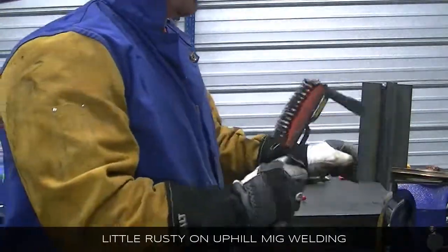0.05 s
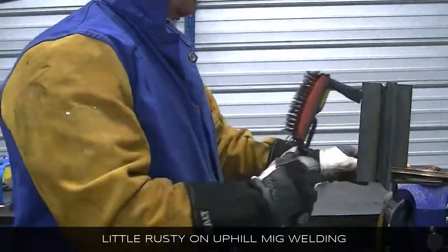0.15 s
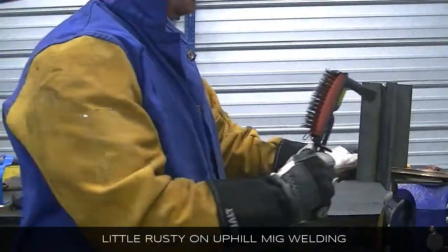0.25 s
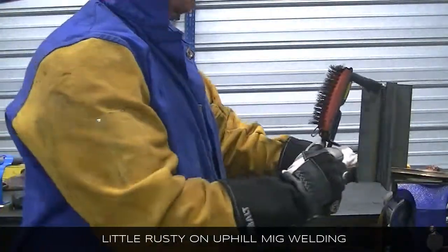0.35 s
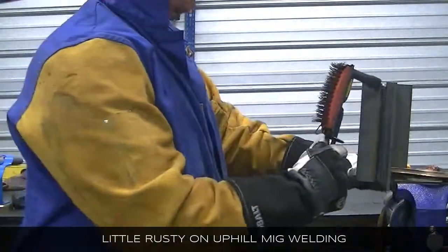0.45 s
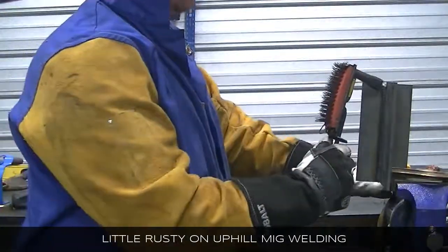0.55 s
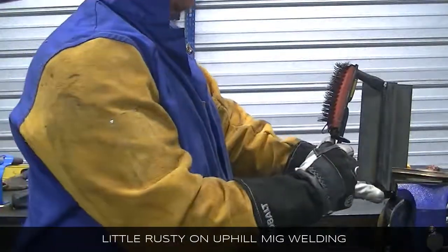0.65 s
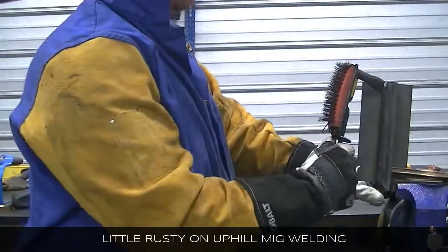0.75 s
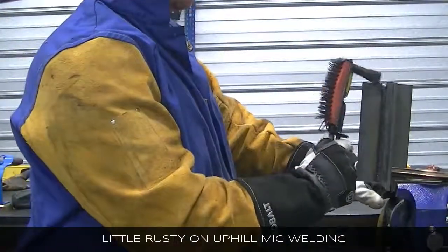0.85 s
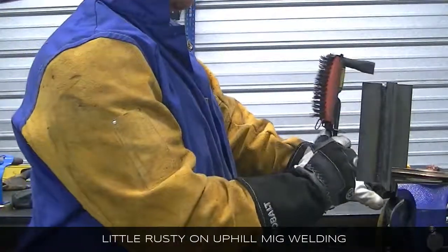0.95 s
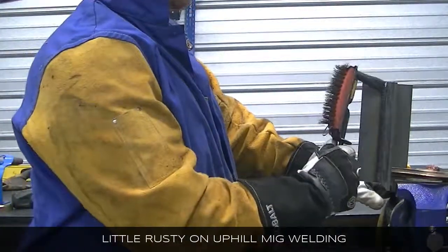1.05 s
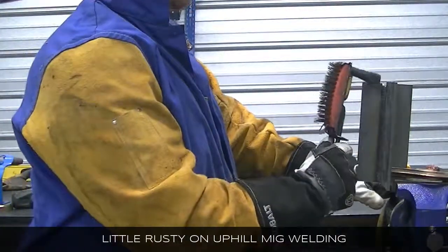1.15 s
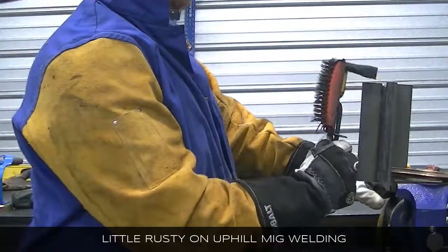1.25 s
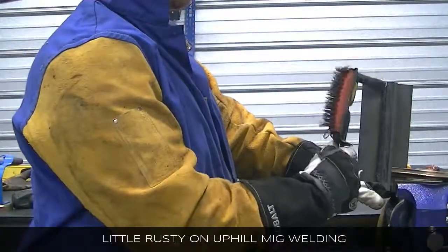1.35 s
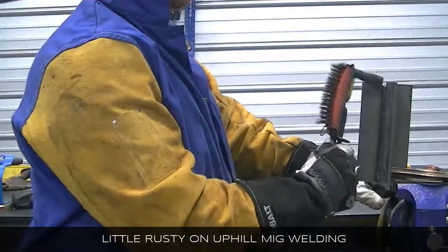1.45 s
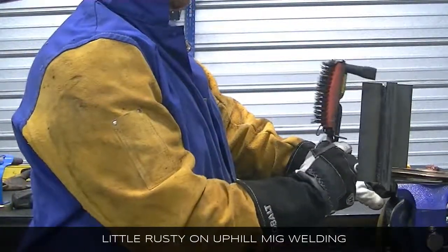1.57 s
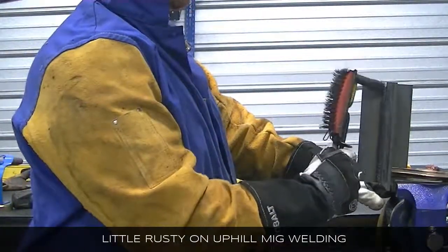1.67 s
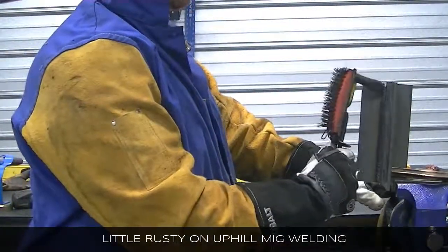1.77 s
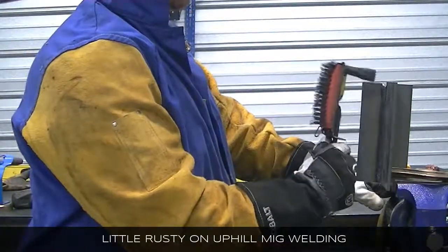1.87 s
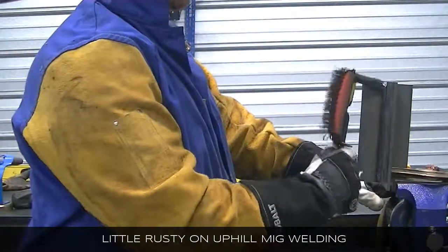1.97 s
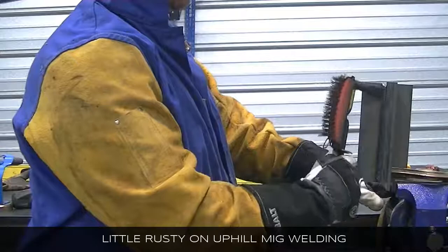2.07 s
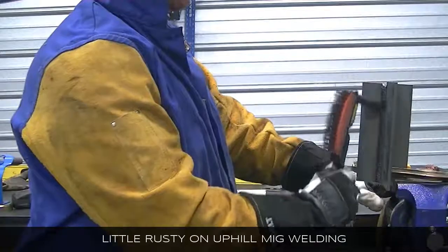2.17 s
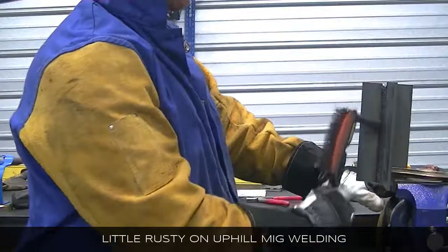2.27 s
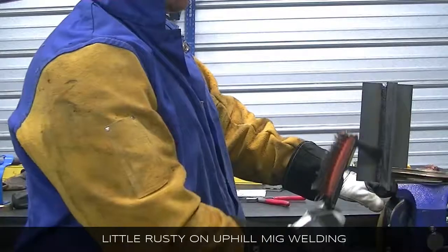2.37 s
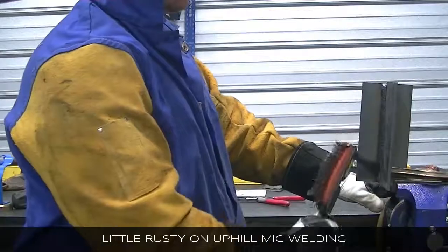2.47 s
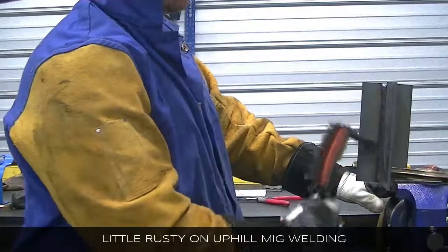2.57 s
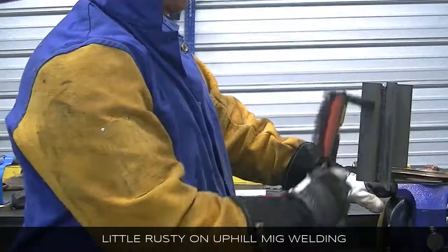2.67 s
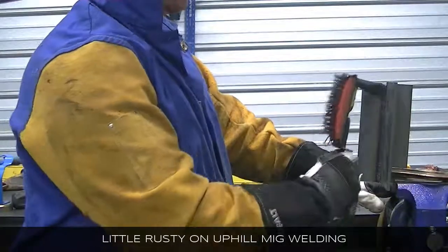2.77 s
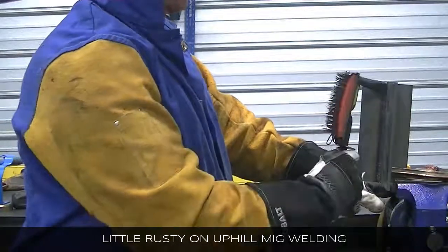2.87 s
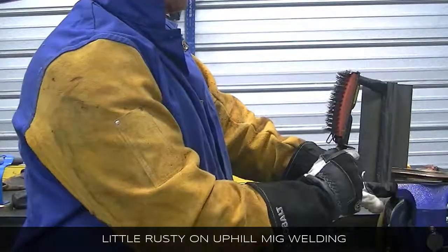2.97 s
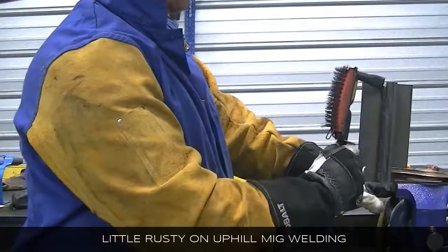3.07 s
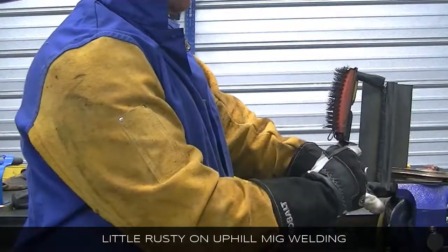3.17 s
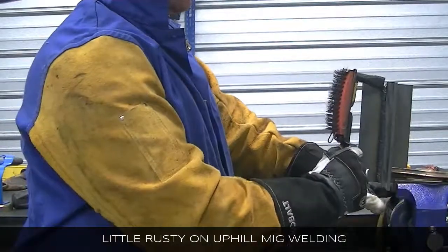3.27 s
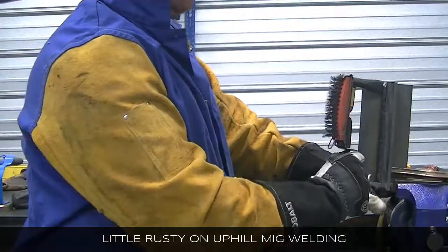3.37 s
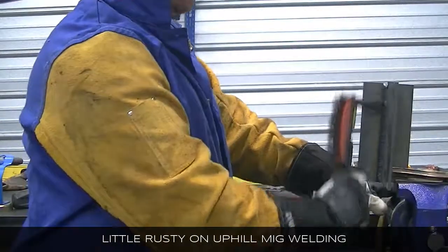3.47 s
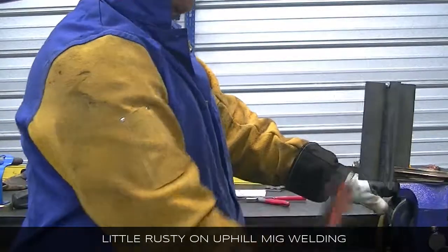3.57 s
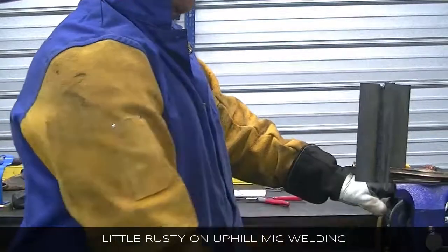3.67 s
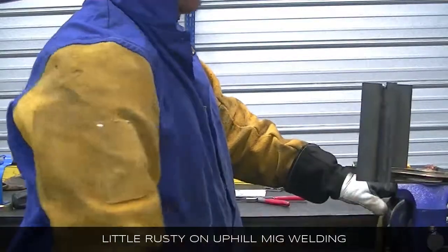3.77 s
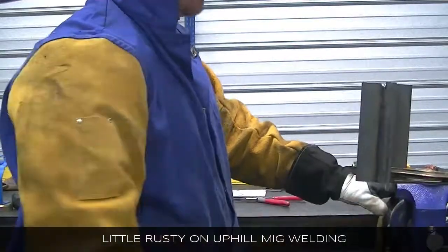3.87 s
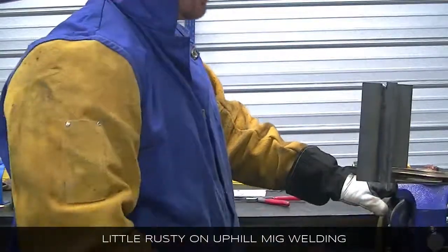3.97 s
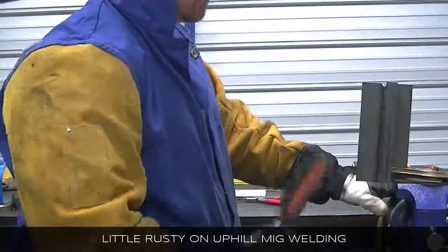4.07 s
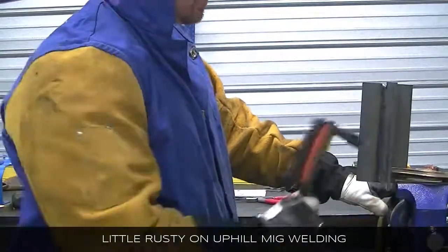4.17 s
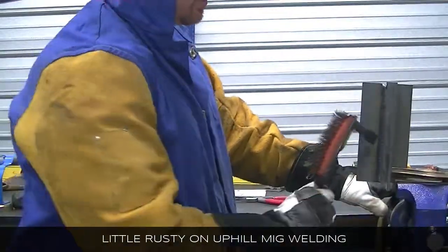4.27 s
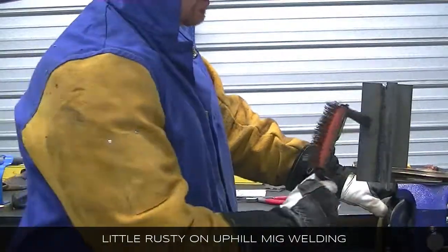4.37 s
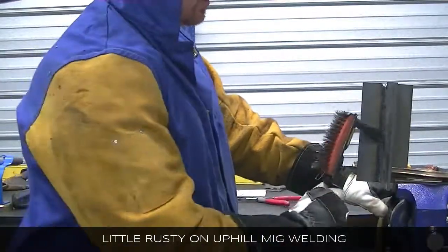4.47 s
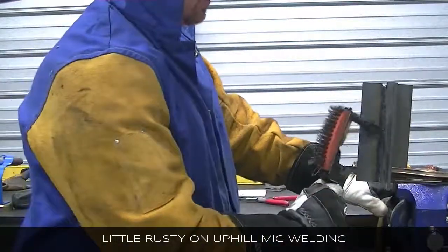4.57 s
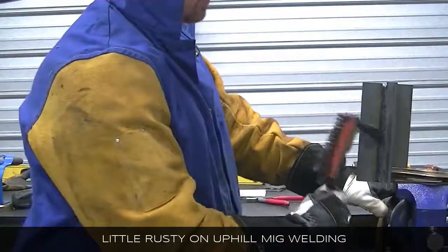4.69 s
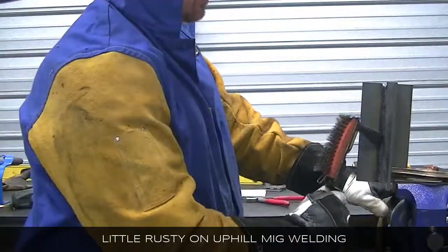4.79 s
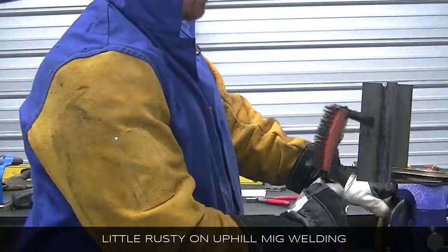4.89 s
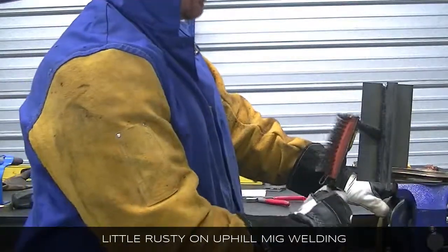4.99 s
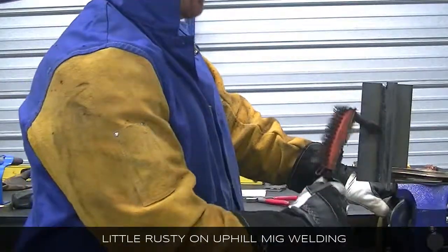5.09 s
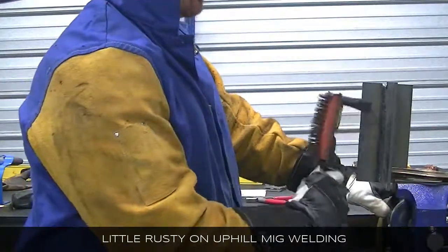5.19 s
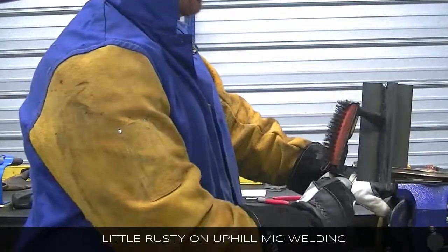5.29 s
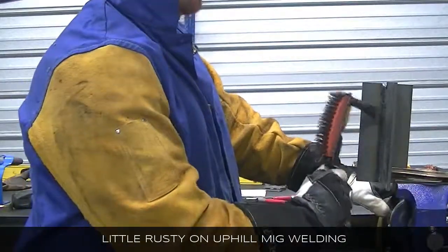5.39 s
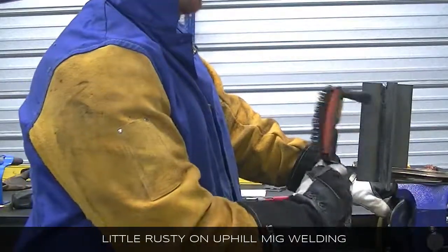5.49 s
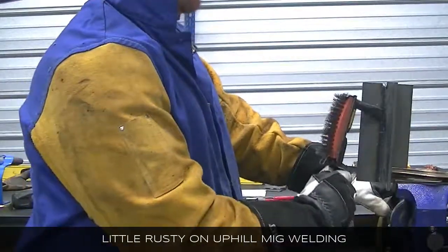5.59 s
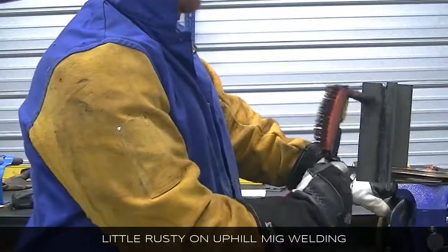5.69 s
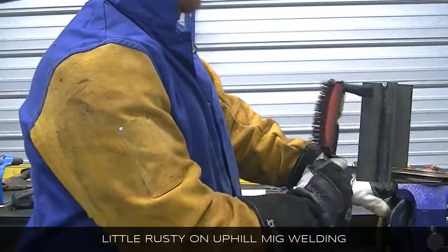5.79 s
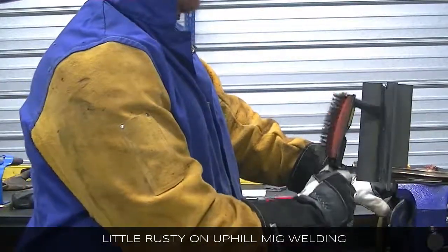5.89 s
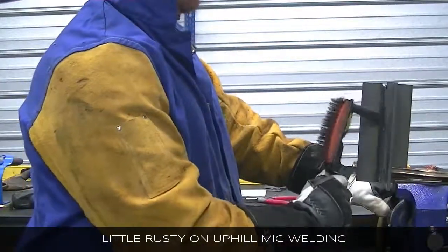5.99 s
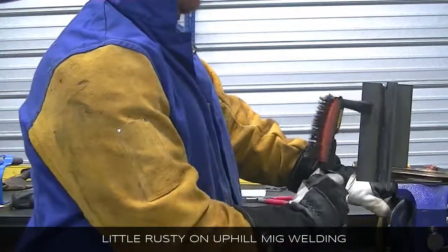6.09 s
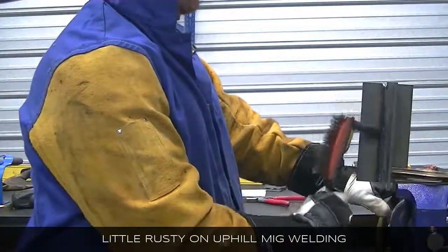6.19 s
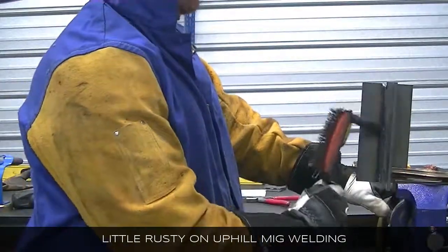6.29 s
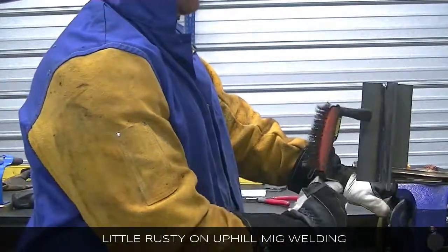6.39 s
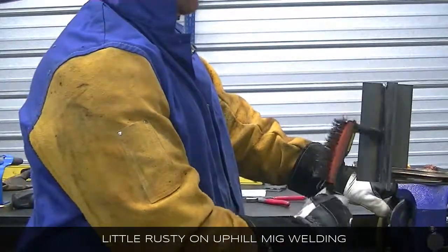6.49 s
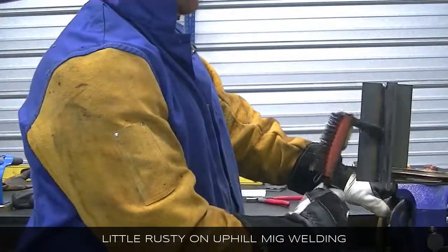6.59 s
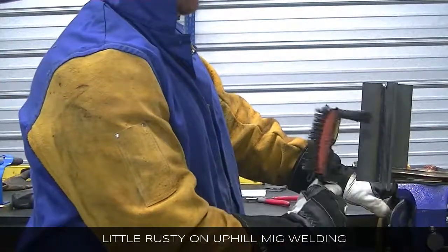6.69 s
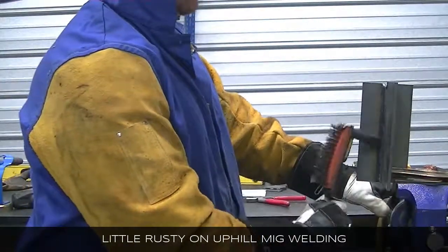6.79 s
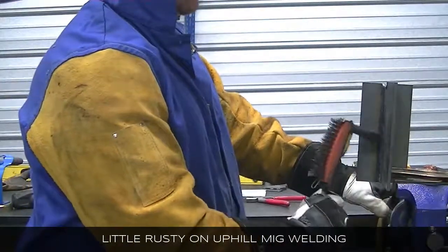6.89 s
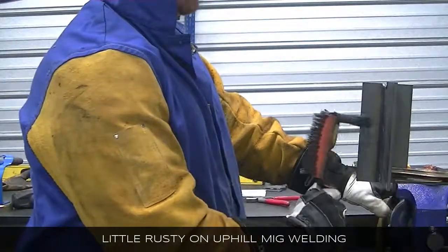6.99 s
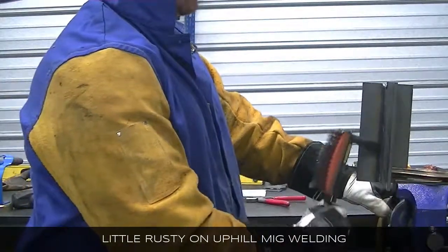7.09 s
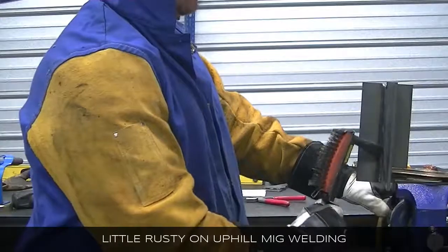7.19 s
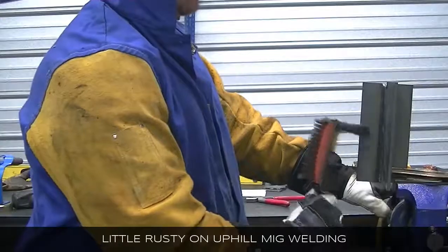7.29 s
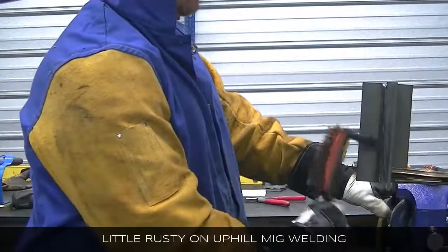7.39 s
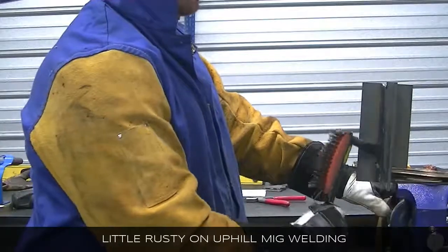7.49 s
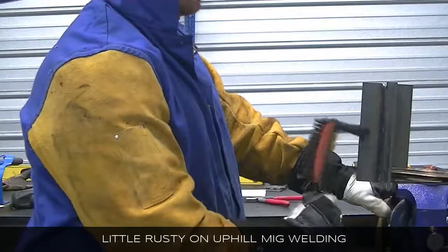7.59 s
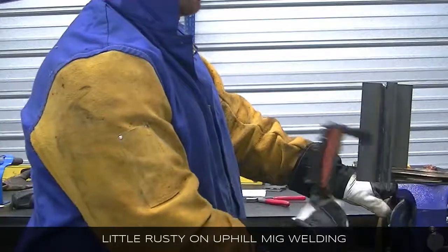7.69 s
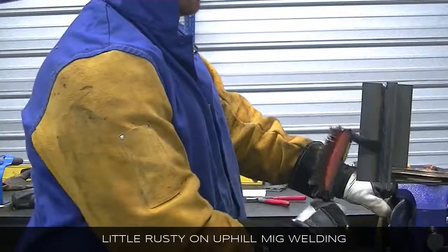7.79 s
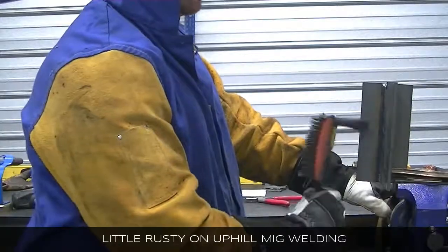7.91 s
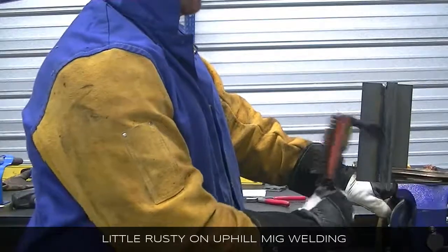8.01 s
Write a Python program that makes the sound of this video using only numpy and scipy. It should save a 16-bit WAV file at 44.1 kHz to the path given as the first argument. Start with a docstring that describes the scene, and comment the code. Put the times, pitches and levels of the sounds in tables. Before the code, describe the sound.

Hard metallic chipping blows in short spaced runs, with two brief scrapes and falling slag crumbs, echo brightly around a bare workshop.

```python
"""The steel scraper end of a wire brush chips slag off a welded joint, close to a single microphone.
Each blow cracks as a snap of noise, clatters as a longer burst and rings as dying sines. Twice the
blade drags over the weld: dense random bumps drive the same rings. Slag crumbs tick on the bench as
thin high noise. The metal walls of the bare workshop answer with a noise echo that dies over most of
a second; still air, a faint hum and the tail of an earlier sound lie underneath."""
import sys
import numpy as np
from scipy import signal
from scipy.fft import rfft, irfft
from scipy.io import wavfile
from scipy.ndimage import uniform_filter1d

SR = 44100
rng = np.random.default_rng(int(sys.argv[2]) if len(sys.argv) > 2 else 0)


def wav_out(sig):
    """Save sig, one row per channel (or a flat mono array), as 16-bit PCM at SR to the path in sys.argv[1]."""
    wavfile.write(sys.argv[1], SR, np.round(np.clip(np.atleast_2d(sig).T, -1, 1) * 32767).astype(np.int16))


def volts(x):
    """Linear amplitude factor 10**(x/20) for a level x in dB, scalar or array-like."""
    e = np.asarray(x, float) / 20
    return 10 ** e


N = 355005  # samples


def read(points, hz):
    """A spectrum table read at the frequencies hz, straight lines over log frequency."""
    f, value = np.transpose(points)
    return np.interp(np.log(hz + 1), np.log(f + 1), value)


def evened(x):
    """Scales to rms 1."""
    return x / np.sqrt(np.mean(x ** 2) + 1e-20)


def add(mix, s, sound):
    """Mixes a sound in at s seconds."""
    part = mix[round(s * SR):][:len(sound)]
    part += sound[:len(part)]


def coloured(x, points):
    """Causal minimum-phase filter with the gain of a spectrum table."""
    hz = abs(np.fft.fftfreq(4096, 1 / SR))
    log_gain = np.log(volts(read(points, hz)))
    taps = np.fft.ifft(np.exp(np.conj(signal.hilbert(log_gain)))).real[:2048]
    return signal.oaconvolve(x, taps)[:len(x)]


def filtered(x, order, hz, kind):
    """Butterworth low or high pass."""
    return signal.sosfilt(signal.butter(order, hz, kind, fs=SR, output="sos"), x)


def tilted(points, low_db, treble_db):
    """Lifts the low and the high end of a spectrum table."""
    corners = np.log([1510, 2300, 5030, 6300])
    return [(hz, db + np.interp(np.log(hz), corners, [low_db, 0, 0, treble_db])) for hz, db in points]


def burst(noise, rise_s, fall_s):
    """Noise under a rise and fall, with the energy of its envelope."""
    t = np.arange(len(noise)) / SR
    shape = (1 - np.exp(-t / rise_s)) * np.exp(-t / fall_s)
    return noise * shape * np.linalg.norm(shape) / np.linalg.norm(noise * shape)


def snap(noise, rise_s, fall_s):
    """A short burst whose spectrum is kept even, since so brief a noise draw has a chance colour."""
    x = burst(noise, rise_s, fall_s)
    energy = np.linalg.norm(x)
    t = np.arange(len(noise)) / SR
    span = np.minimum(1, np.exp(3 - t / fall_s)) * (1 - np.exp(-4 * t / rise_s))
    for _ in range(4):  # flatten the spectrum, then hold the snap short again
        z = rfft(x)
        x = span * irfft(z / (abs(z) + 1e-9), len(x))
    return x * energy / np.linalg.norm(x)


# what is left in the shop of an earlier sound: (frequency [Hz], relative level per Hz [dB])
EARLIER_COLOUR = [(59, -54), (100, -33), (295, -16), (801, -22), (1150, -19), (2580, -15), (16000, -36)]


def earlier(start_db=-58, t60_s=0.64):
    """The last of an echo whose cause is already over: coloured noise that only dies away."""
    fade = volts(start_db - 60 * np.arange(N) / SR / t60_s)
    return fade * evened(coloured(rng.standard_normal(N), EARLIER_COLOUR))


# still air of the shop: (frequency [Hz], relative level per Hz [dB])
AIR_COLOUR = [(25, -6), (60, -19), (90, -16.5), (140, 0), (400, -1.5), (750, -0.5), (1200, -3.5),
              (3500, -8.5), (8000, -15), (12000, -16), (16000, -19)]
# faint hum of the shop: (frequency [Hz], width [Hz], level [dB])
HUM_BANDS = [(537, 13, -92.5), (638, 44, -100), (801, 21, -79.5)]


def air(air_db=-70.5):
    """Steady hiss with a few fuzzy hum bands, each a narrow resonance on noise."""
    out = volts(air_db) * evened(coloured(rng.standard_normal(N), AIR_COLOUR))
    for hz, width, db in HUM_BANDS:
        b, a = signal.iirpeak(hz, hz / width, SR)
        out += volts(db) * evened(signal.lfilter(b, a, rng.standard_normal(N)))
    return out


def ring(modes, place, luck=np.zeros(20), node_db=7, rise_cycles=0.4, luck_db=4):
    """Dying sines that rise within about two cycles; each is loudest when struck at its own place."""
    hz, db, t60, best = np.transpose(modes)[:, :, None]
    t = np.arange(SR // 2) / SR
    place_db = node_db * (np.cos(2 * np.pi * (place - best)) - 1)
    struck_db = db + place_db + luck_db * luck[:len(modes), None]
    rise = (1 - np.exp(-t * hz / rise_cycles)) ** 2
    side = (-1.) ** np.arange(len(modes))[:, None]  # neighbouring modes swing opposite ways
    sines = side * volts(struck_db - 60 * t / t60) * rise * np.sin(2 * np.pi * hz * t)
    return sines.sum(0)


# rings of plates and blade, low to high, each list with the columns
# (frequency [Hz], relative level [dB], t60 [s], place on the weld where it rings most [0-1])
LOW_MODES = [(148.7, -50, 0.56, 0.57), (161.2, -51.5, 0.93, 0.66), (268, -37.5, 0.13, 0.7),
             (322.6, -40.5, 0.12, 0.6), (508.3, -25, 0.1, 0.83), (642.6, -32, 0.36, 0.54),
             (736, -18, 0.045, 0.59), (1080, -36.5, 0.14, 0.92), (1184, -8, 0.073, 0.11),
             (1173.5, -20.5, 0.22, 0.42), (1194, -14, 0.043, 0.73), (1314, -20, 0.083, 0.9),
             (1406, -23, 0.4, 0.47), (1440, -33, 0.13, 0.7), (1716, -18, 0.038, 0.59),
             (1800, -29, 0.17, 0.8)]
CLEAR_MODES = [(2862, -14.5, 0.12, 0.76), (2855, -34.5, 0.23, 0.93), (2740, -43, .03, 0.31),
               (3300, -30, 0.18, 0.3), (3466, -30.5, 0.56, 0.64), (2770, -33, .15, 0.29)]
BLADE_MODES = [(3966, 0, 0.023, 0.39), (4104, -0.5, 0.023, 0.7), (4249, -1.5, 0.018, 0.53),
               (4360, -1, 0.019, 0.41), (4512, -10, .03, 0.74)]
TREBLE_MODES = [(6416, -38, 0.37, 0.57), (6430, -19, 0.022, 0.59), (7463, -42, 0.29, 0.44),
                (7500, -38, 0.23, 1), (7860, -35.5, .12, 1), (8700, -32, 0.026, 0.95),
                (8970, -31, 0.16, 0.27), (10740, -35, 0.08, .4), (11200, -37, 0.068, 0.4),
                (12050, -39, .08, .9), (12460, -37.5, .1, 0.34), (13500, -45, 0.095, 1),
                (13880, -49, .12, .78), (14300, -34, 0.035, .55)]


def joint(low_db, clear_db, treble_db, place, luck):
    """All rings of plates and blade after one contact; the treble depends least on the place."""
    low = volts(low_db) * ring(LOW_MODES, place, luck)  # by luck no two blows stir a mode alike
    clear = volts(clear_db) * ring(CLEAR_MODES, place)
    treble = volts(treble_db) * ring(TREBLE_MODES, place, luck, node_db=4.5)
    return low + clear + ring(BLADE_MODES, place) + treble


# blows and their bounces on the weld:
# (time [s], strength [dB], clear ring [dB], treble [dB], place on the weld [0-1])
BLOW_LIST = [(0.371, -63, -14, -19, 1), (0.6706, -54, -10, 20, 0.73), (1.0411, -20, 10, 2.5, 1),
             (1.343, -8, 7.5, 2.5, 0.85), (1.6397, -7.5, 11, 4, .9), (1.9822, -4, 10.5, 3, 0.94),
             (2.805, -32.5, 10, 1.5, 0.9), (3.11, -47, -17, 12, 0.85), (3.339, -29, 7, 4, 0.92),
             (4.461, -20, 6.5, 6.5, 0.49), (4.711, -22, 1, -23, 0.49), (4.719, -16.5, -5, -1, 0.92),
             (4.983, -19.5, 1.5, 8, 0.68), (5.268, -14.5, 1, 7.5, 0.84), (5.548, -18, 0.5, 11, 0.76),
             (5.849, -7.5, 7, 3.5, 0.7), (6.1739, -9.5, 6.5, 4, 0.63), (6.465, -11, 7, 7, 0.7),
             (6.7655, -8, 9, 5, 0.61), (7.084, -13, 0.5, 7, 0.45), (7.095, -20.5, 13, -25, 0.76),
             (7.406, -12.5, 14, 14, 0.44), (7.415, -11.5, -6.5, -22, 0.27), (7.724, -20, 15, 18.5, 0.48),
             (7.73, -10, 0.5, -26, 0.58), (8.036, -23, 15, 5, 0.52), (8.046, -20.5, 1, 8, 0.27)]
# crack of the first milliseconds: (frequency [Hz], gain [dB])
CRACK_COLOUR = [(200, -59), (600, -17.5), (1250, 15.5), (2000, 12), (2750, 14), (3050, 11.5), (3700, 10),
                (4300, 11.5), (5500, 4.5), (8000, -11), (13000, -9.5), (16000, -49)]
# clatter of countless small plate modes just after it: (frequency [Hz], gain [dB])
CLATTER_COLOUR = [(60, -46.5), (130, -34.5), (240, -14), (500, -2), (800, -1.5), (1250, -5.6), (1900, -8.5),
                  (2750, -10.5), (3050, -16), (3700, -14.5), (4300, -1), (5000, -11), (6400, -9),
                  (10000, -23.5), (16000, -32.5)]


def blows(crack_db=-2, clatter_db=-18, low_even_db=-18, low_loss=0.41, low_most_db=5):
    """Slag cracks, plates clatter (both noise) and the joint rings on: rows noise, rings.
    The low end grows more slowly than the blow: low_loss is the dB lost per dB of strength."""
    noise, rings = np.zeros((2, N))
    draws = rng.standard_normal((len(BLOW_LIST), 2, 8192))
    for (s, db, clear_db, treble_db, place), (grit, hiss) in zip(BLOW_LIST, draws):
        low_db = min(low_loss * (low_even_db - db), low_most_db)
        crack = volts(crack_db) * snap(grit, rise_s=0.00087, fall_s=0.0017)
        clatter = volts(clatter_db) * burst(hiss, rise_s=0.0012, fall_s=0.059)
        add(noise, s, volts(db) * coloured(crack, tilted(CRACK_COLOUR, low_db, treble_db)))
        add(noise, s, volts(db) * coloured(clatter, tilted(CLATTER_COLOUR, low_db, treble_db)))
        add(rings, s, volts(db) * joint(low_db, clear_db, treble_db, place, luck=hiss))
    return noise, rings


# pressure of the dragging blade, one list per drag: (time [s], level [dB])
DRAG_PRESSURE = [
    [(2.10, -53), (2.14, -47), (2.24, -51.5), (2.32, -50), (2.38, -44.5), (2.44, -49), (2.48, -64),
     (2.55, -83)],
    [(3.29, -63.5), (3.33, -66), (3.36, -48), (3.42, -63), (3.47, -42.5), (3.55, -37.5), (3.59, -32.5),
     (3.63, -52), (3.68, -59)],
]
# grinding of slag under the blade: (frequency [Hz], gain [dB])
GRIND_COLOUR = [(100, -21), (300, -16), (700, -13), (1250, 4), (2500, 5.5), (4300, 5), (6500, -2),
                (11000, -18), (16000, -35)]


def bumps(bumps_per_s=2500, spread_db=4.0, catch_db=4.25):
    """Ripples of the weld as random pulses of either sign, swelling as the edge catches and slips."""
    height = volts(spread_db * np.minimum(rng.exponential(1, N), 4))
    pulses = (rng.random(N) < bumps_per_s / SR) * height
    catches = evened(uniform_filter1d(rng.standard_normal(N), size=600))
    return evened(pulses * rng.choice([-1, 1], N) * volts(catch_db * catches))


def drags(mid_db=-47.5, low_db=5.5, low_loss=0.28, treble_db=3.5, treble_loss=0.2, grind_db=7,
          ring_db=-15, clear_db=3, blade_db=3, sizzle_db=6, place=0.79, treble_place=0.61):
    """The blade chatters over the weld: dense tiny blows drive the grinding and the rings.
    Low end and treble lose some dB (low_loss, treble_loss) per dB of pressure above mid_db."""
    chatter = bumps()
    t, drive = np.arange(N) / SR, np.zeros((3, N))  # rows low, middle, treble
    for rows in DRAG_PRESSURE:
        s, db = np.transpose(rows)
        low_lift = low_db - low_loss * (db - mid_db)
        treble_lift = treble_db - treble_loss * (db - mid_db)
        for row, lift in zip(drive, (low_lift, 0, treble_lift)):
            row += volts(np.interp(t, s, db + lift, -200, -200)) * chatter
    grind = volts(grind_db) * coloured(signal.unit_impulse(SR // 2), GRIND_COLOUR)
    low = filtered(grind, 2, 2000, "low")
    high = filtered(grind, 2, 5700, "high")
    middle_ring = volts(clear_db) * ring(CLEAR_MODES, place) + volts(blade_db) * ring(BLADE_MODES, place)
    treble_ring = volts(sizzle_db) * ring(TREBLE_MODES, treble_place)
    rings = np.array([ring(LOW_MODES, place), middle_ring, treble_ring])
    body = volts(ring_db) * rings + [low, grind - low - high, high]
    return signal.oaconvolve(drive, body, axes=1).sum(0)[:N]


def crumb(chip, fine, tick_db=4, dust_db=-26, edge_hz=5600, edge_spread=0.12):
    """A crumb on the bench: a thin tick and finer dust, high-passed at an edge that varies by chance."""
    tick = volts(tick_db) * snap(chip, rise_s=0.00005, fall_s=0.00016)
    dust = volts(dust_db) * burst(fine, rise_s=0.001, fall_s=0.057)
    return filtered(tick + dust, 3, edge_hz * np.exp(edge_spread * chip[0]), "high")


# the larger slag crumbs: (time [s], level [dB])
CRUMB_FALLS = [(2.1403, -33), (2.1724, -37), (2.219, -39), (2.3156, -27), (3.4236, -34), (3.4518, -37),
               (3.469, -20), (3.570, -18), (3.6197, -25), (3.898, -25.5), (3.937, -28), (3.955, -41.5),
               (4.0242, -32.5), (4.1933, -34.5), (4.2042, -34), (4.3573, -41), (4.409, -42), (4.4754, -39),
               (6.036, -35.5), (7.9404, -45)]
# showers of tiny crumbs: (start [s], end [s], level [dB])
CRUMB_SHOWERS = [(2.1, 2.5, -45), (3.4, 3.7, -42), (3.95, 4.35, -55)]


def crumbs(shower_per_s=14, shower_spread_db=2.5):
    """Larger crumbs fall at their times; tiny ones, all of one sound, fall at random in showers."""
    out, t = np.zeros(N), np.arange(N) / SR
    for (s, db), pair in zip(CRUMB_FALLS, rng.standard_normal((len(CRUMB_FALLS), 2, 8192))):
        add(out, s, volts(db) * crumb(*pair))
    level = sum(volts(db) * (t > start) * (t < end) for start, end, db in CRUMB_SHOWERS)
    sizes = volts(shower_spread_db * rng.standard_normal(N))
    falls = level * (rng.random(N) < shower_per_s / SR) * sizes
    return out + signal.oaconvolve(falls, crumb(*rng.standard_normal((2, 8192))))[:N]


# decay of the workshop: (frequency [Hz], t60 [s])
ECHO_T60 = [(120, 0.4), (330, 0.96), (870, 0.84), (2300, 1.036), (6000, 0.73), (10000, 0.59), (16000, 0.45)]
# strength of its echo: (frequency [Hz], level [dB])
ECHO_LEVEL = [(100, 1.5), (300, 16), (1000, 13), (2500, -0.5), (5000, 0.5), (10000, -6), (16000, -8)]
# build-up of its echo: (frequency [Hz], time constant [s])
ECHO_RISE = [(150, 0.0071), (1000, 0.014), (4000, 0.001), (16000, 0.00082)]


def shop_echo():
    """Echo of the metal walls: noise that builds up and dies band by band, silent for 4 ms."""
    hz, t, z = signal.stft(rng.standard_normal(SR * 3 // 2), SR, nperseg=256)
    fade = volts(-60 * t / read(ECHO_T60, hz)[:, None])
    shape = fade * (1 - np.exp(-t / read(ECHO_RISE, hz)[:, None]))
    shape /= np.sqrt((shape ** 2).sum(1, keepdims=True) * SR * (t[1] - t[0]))  # energy 1 in every band
    echo = signal.istft(z * shape * volts(read(ECHO_LEVEL, hz))[:, None], SR, nperseg=256)[1]
    return echo * (np.arange(len(echo)) > 0.004 * SR)


def walls(sent, cycle_s=2.3):
    """Three random echoes of the one shop, blended in turn so no single draw stamps its peaks."""
    turn = 2 * np.pi * (np.arange(N) / SR / cycle_s + np.arange(3)[:, None] / 3)
    shares = np.sqrt(2 / 3) * np.cos(turn)  # the squares always sum to 1
    return sum(signal.fftconvolve(sent * share, shop_echo())[:N] for share in shares)


def overload(x, ceiling=0.9):
    """The hardest cracks overload the microphone softly."""
    return x / (1 + abs(x / ceiling) ** 4) ** 0.25


def scene(crumb_echo_db=-8, ring_echo_db=-5):
    """Direct sound and its echo, which carry little bass, over the background."""
    (noise, rings), drag, dust = blows(), drags(), crumbs()
    sent = noise + drag + volts(ring_echo_db) * rings + volts(crumb_echo_db) * dust
    near = overload(noise + drag + rings + dust + walls(sent))
    thin = filtered(near, 2, 150, "high")
    return (thin + earlier() + air())[None]


def low_pass(x):
    """Removes everything above the highest recorded frequency."""
    return signal.sosfilt(signal.butter(12, 16800, fs=SR, output="sos"), x)


def record(dry, top_hz=16050):
    """The finished mix, with nothing much kept above top_hz."""
    edge = signal.firwin(255, top_hz, window=("kaiser", 8), fs=SR)
    mix = signal.oaconvolve(dry, edge[None], "same")
    return low_pass(mix)


dry = scene()
out = record(dry)
wav_out(out)
```